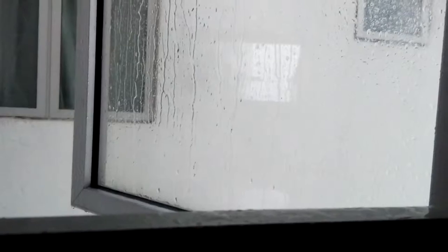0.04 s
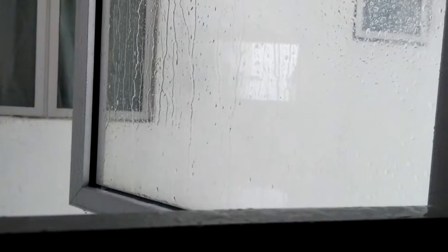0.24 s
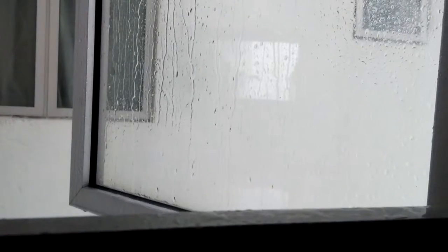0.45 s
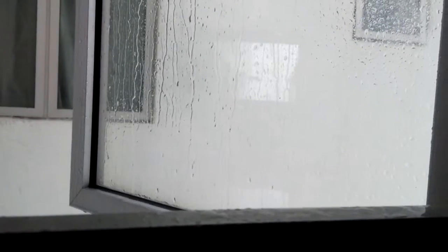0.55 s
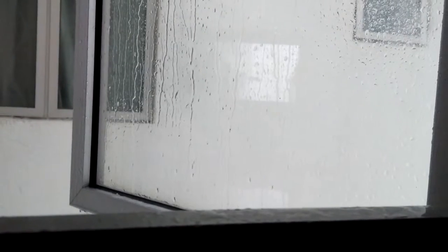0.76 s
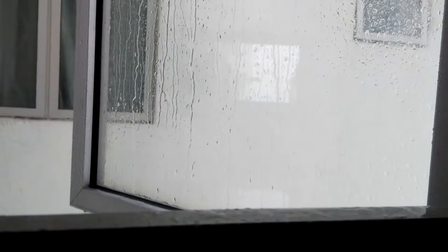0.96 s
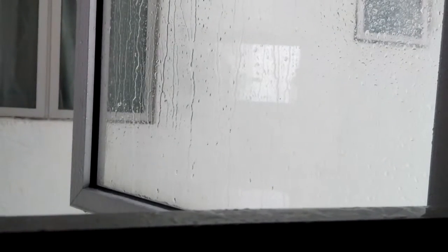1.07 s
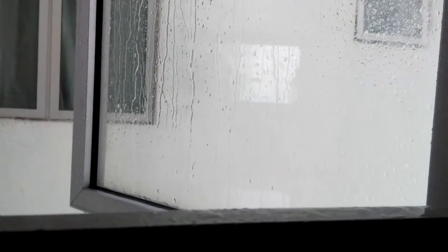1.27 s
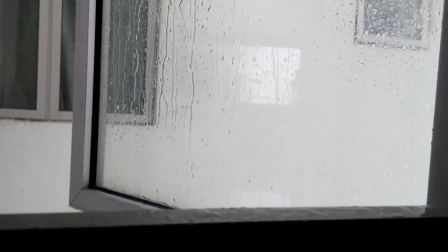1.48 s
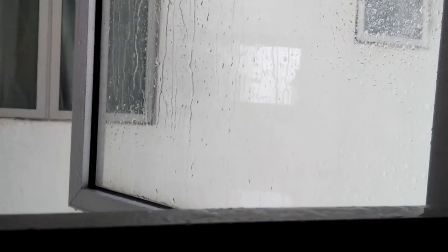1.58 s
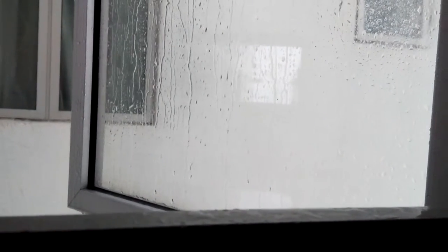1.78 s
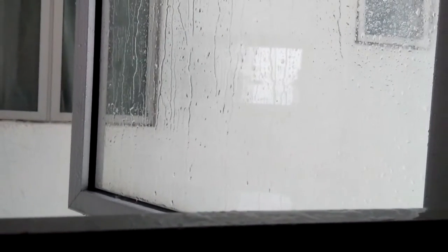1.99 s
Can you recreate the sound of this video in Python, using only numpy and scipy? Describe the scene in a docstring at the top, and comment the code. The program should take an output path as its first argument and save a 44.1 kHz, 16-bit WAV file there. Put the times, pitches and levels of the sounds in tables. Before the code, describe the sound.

A microphone pops on indoors, and heavy rain pours outside an open window while a low rumble fills the room. Heavy drips ring, fine spray brushes the pane and a few drops tap the frame, before a bright click.

```python
"""Heavy rain in a courtyard, heard from a room through an open window.
After a short silence the microphone switches on with a pop in the left channel.
From then on, countless drops merge into a wash over a low rumble that booms in the room.
Soon heavy drips start to ring what they land on, and a gust throws fine spray against the pane.
A few drops tap on the window frame close by, and a short bright click comes at the very end."""
import sys
import numpy as np
from scipy import signal
from scipy.fft import rfft, irfft
from scipy.io import wavfile
from scipy.ndimage import uniform_filter1d

SR = 44100
rng = np.random.default_rng(int(sys.argv[2]) if len(sys.argv) > 2 else 0)


def pcm_store(signal):
    """Save signal as 16-bit PCM."""
    levels = np.round(np.clip(np.atleast_2d(signal), -1, 1) * 32767)
    wavfile.write(sys.argv[1], SR, levels.astype(np.int16).T)


N = 90404
TIME = np.arange(N) / SR
FREQS = np.maximum(np.arange(N // 2 + 1) * SR / N, 1)
ALIKE_BELOW_HZ = 1030  # below this, both ears hear nearly the same rain


def undb(db):
    """Turn decibels into a gain, a number to multiply a sound by."""
    return 10 ** (np.asarray(db) / 20)


def unit(x):
    """Scale each channel to an average power of 1."""
    return x / np.sqrt(np.mean(x ** 2, axis=-1, keepdims=True))


def curve(rows):
    """Gain over time from (time [s], level [dB]) points."""
    return undb(np.interp(TIME, *np.array(rows).T))


def shape(rows):
    """Gain over frequency from (frequency [Hz], level [dB]) points."""
    hz, db = np.array(rows).T
    return undb(np.interp(np.log(FREQS), np.log(hz), db))


def colour(x, gain):
    """Turn each frequency of a sound up or down by its gain."""
    return irfft(rfft(x) * gain, N)


def resonance(hz, width):
    """A bump of height 1 around one frequency."""
    return 1 / (1 + (2 * (FREQS - hz) / width) ** 2)


def below(hz, order):
    """A gain that keeps the lows; a higher order cuts more sharply."""
    return 1 / (1 + (FREQS / hz) ** order)


def steady(x, span_s=.09):
    """Even out the slow swells of a noise, leaving its quick flutter."""
    power = uniform_filter1d(np.mean(x ** 2, axis=0), int(span_s * SR))
    return x / np.sqrt(uniform_filter1d(power, int(span_s * SR / 2)))


# Tone of the rumble, and of the part that differs between the ears (frequency [Hz], relative level [dB])
RUMBLE_TONE = [(15, -10.5), (30, 1.5), (70, -3.5), (120, -4.5), (200, -3), (280, -3.5), (350, -7.5),
               (450, -15), (700, -24), (1500, -53)]
SIDE_TONE = [(20, 10), (50, -34), (120, -16), (250, -23.5), (500, -7.5)]
# Notes at which the room booms (frequency [Hz], width [Hz], boost [dB])
ROOM_NOTES = [(47.6, 7, 12.2), (93.5, 37, 13.6), (150.9, 11, 14.3), (199.6, 9.6, 6.3), (222.8, 18.7, 5.9),
              (277, 7.3, 5.1)]
# How the rumble's deep, middle and upper parts swell (time [s], relative level [dB])
DEEP_SWELL = [(.22, -37), (.33, -37.5), (.44, -29), (.53, -36), (.59, -25), (.72, -30), (.78, -36),
              (.84, -31), (.96, -38), (1.05, -30.5), (1.2, -33.5), (1.28, -31.5), (1.5, -34), (1.62, -37.5),
              (1.88, -37), (2.05, -37.5)]
MIDDLE_SWELL = [(.25, -40), (.58, -30.5), (.66, -37.5), (.88, -30.5), (1.0, -38.5), (1.09, -31.5),
                (1.22, -36.5), (1.3, -31), (1.39, -40), (1.46, -34), (1.66, -36), (1.82, -37.5),
                (1.98, -34), (2.05, -42.5)]
UPPER_SWELL = [(.22, -39.5), (.33, -35.5), (.39, -32.5), (.52, -36), (.65, -31.5), (.77, -33.5), (.84, -30),
               (.9, -31.5), (1.08, -31.5), (1.2, -34), (1.28, -32), (1.4, -33.5), (1.51, -34), (1.64, -36),
               (1.8, -34.5), (2.05, -36)]

def rumble():
    """A low roar that booms in the room; its three parts each surge on their own."""
    room_db = sum(db * resonance(hz, width) for hz, width, db in ROOM_NOTES)
    tone = shape(RUMBLE_TONE) * undb(room_db)
    shared = rng.standard_normal(N)
    side = colour(rng.standard_normal(N), shape(SIDE_TONE))
    ears = np.array([shared + side, shared - side])
    lowest, low = below(hz=113.4, order=12), below(hz=179.5, order=16)
    deep = steady(colour(ears, tone * lowest)) * curve(DEEP_SWELL)
    middle = steady(colour(ears, tone * (low - lowest))) * curve(MIDDLE_SWELL)
    upper = steady(colour(ears, tone * (1 - low))) * curve(UPPER_SWELL)
    return deep + middle * undb(-3) + upper * undb(-.5)


def patter(drops_per_s=2400, spread_db=3, splash_s=.0021, near_share=.37):
    """Many drops of uneven size, each with a short splash, in a haze of far ones."""
    hits = rng.random(N) < drops_per_s / SR
    sizes = undb(spread_db * np.minimum(rng.exponential(size=N), 5))
    clicks = hits * sizes * rng.choice([-1, 1], N)
    one_splash = np.exp(-TIME / splash_s) * rng.standard_normal(N)
    splash_power = np.maximum(signal.fftconvolve(clicks ** 2, one_splash ** 2)[:N], 0)
    splashes = unit(np.sqrt(splash_power) * rng.standard_normal(N))
    near = unit(splashes + .5 * unit(clicks))
    far = rng.standard_normal(N)
    return (np.sqrt(near_share) * near + np.sqrt(1 - near_share) * far) * flicker()


def flicker(depth_db=1.06, steps_per_s=14.15):
    """A gain that wanders a little up and down at random."""
    steps = rng.standard_normal(400)
    return undb(depth_db * np.interp(TIME * steps_per_s, np.arange(len(steps)), steps))


def spray(peak_s=.63, swell_s=.059, level_db=-54):
    """A gust throws fine, airy spray against the pane."""
    swell = np.exp(-((TIME - peak_s) / swell_s) ** 2)
    hiss = colour(np.array([patter(), patter()]), resonance(hz=10300, width=4000))
    return undb(level_db) * swell * unit(hiss)


# Heavy drips (time [s], pitch [Hz], level [dB], time to fade by 60 dB [s])
HEAVY_DRIPS = [(.47, 900, -46, 0.85), (.515, 1250, -36.5, 0.12), (.585, 1136, -39, 0.28),
               (.832, 240, -27, 0.18), (.972, 833, -41.5, 0.48), (.9905, 8450, -38, 0.033),
               (1.276, 147, -30.5, 0.24), (1.51, 149.8, -25, 0.29)]

def drips(rise_s=.003):
    """Heavy drips outside, each ringing what it lands on with one fading note."""
    out = np.zeros((2, N))
    for start, hz, db, fade_s in HEAVY_DRIPS:
        age = np.maximum(TIME - start, 0)
        rise = np.minimum(age / rise_s, 1)
        phase = min(hz / ALIKE_BELOW_HZ, 1) * rng.random((2, 1)) / 4  # low notes differ less per ear
        out += rise * undb(db - 60 * age / fade_s) * np.sin(2 * np.pi * (hz * age + phase))
    return out


# Close taps; the last row is a short bright click at the very end
# (time [s], noise level [dB], boosted frequency [Hz], ring level [dB])
CLOSE_TAPS = [(0.636, -40, 9200, -45), (0.99, -47, 8400, -52), (1.25, -28, 9000, -58),
              (1.502, -41, 5000, -39), (2.0116, -22.5, 5600, -29.5), (2.0465, -28.5, 6000, -43)]
# Tone of a tap's noise (frequency [Hz], relative level [dB])
TAP_TONE = [(500, -17), (2000, -1), (3100, -10), (4300, 1), (7200, -2.5), (9200, -6), (11000, -9.5),
            (14000, -17)]
# Notes the frame rings with (pitch [Hz], relative level [dB], time to fade by 60 dB [s])
FRAME_NOTES = [(239, -14, 0.61), (837, -7.5, 0.14), (1024, -3.5, 0.057), (1240, 2, 0.072),
               (2114, -14.5, 0.14)]

def taps(rise_s=.0025, hold_s=.00085, decay_s=.0011, echo_db=-14.5, echo_s=.025):
    """Near drops tap the frame, then a bright click ends the sound; each is a noise burst and a ring."""
    out = np.zeros((2, N))
    for start, noise_db, bright_hz, ring_db in CLOSE_TAPS:
        age = np.maximum(TIME - start, 0)
        rise = np.minimum(age / rise_s, 1)
        burst = np.exp(-np.maximum(age - hold_s, 0) / decay_s)
        echo = undb(echo_db) * np.exp(-age / echo_s)
        tone = shape(TAP_TONE) * undb(3 * resonance(bright_hz, width=3200))
        noise = (burst + echo) * unit(colour(rng.standard_normal((2, N)), tone))
        ring = np.zeros((2, N))
        for hz, db, fade_s in FRAME_NOTES:
            phase = rng.random((2, 1)) / 4
            ring += undb(db - 60 * age / fade_s) * np.sin(2 * np.pi * (hz * age + phase))
        out += rise * (undb(noise_db) * noise + undb(ring_db) * ring)
    return out


def pings(per_s=390, low_hz=649.7, high_hz=6993, decay_cycles=64, spread_db=2.5):
    """Tiny droplets ping in the wet, each with its own pitch, size and place."""
    out = np.zeros((2, N))
    for when, pitch, size, place, lag in rng.random((int(per_s * N / SR), 5)):
        hz = low_hz + (high_hz - low_hz) * pitch ** 2
        first = int(when * N)
        length = min(N - first, int(5 * decay_cycles * SR / hz))
        cycles = np.arange(length) * hz / SR
        ring = np.exp(-cycles / decay_cycles) * np.sin(2 * np.pi * (cycles + np.array([[0], [lag]])))
        strength = undb(-spread_db * np.log(max(size, .02))) * hz ** .75
        left_right = np.sqrt([[place], [1 - place]])
        out[:, first:first + length] += strength * left_right * ring
    return unit(out)


# Tone of the rain at each ear (frequency [Hz], relative level [dB])
RAIN_TONE_LEFT = [(100, -25.5), (400, -5), (620, -3.5), (900, 0), (1250, -1), (1500, -5), (2100, -4),
                  (2700, -12.5), (3400, -14), (4200, -12.5), (7000, -13.5), (9500, -16.5), (12000, -25.5),
                  (14500, -32)]
RAIN_TONE_RIGHT = [(100, 2), (400, -1.5), (620, -1), (900, 0), (1250, -2), (1500, -5.5), (2100, -6),
                   (2700, -10.5), (3400, -11.5), (4200, -12), (7000, -15), (9500, -19.5), (12000, -26.5),
                   (14500, -33)]
# How the rain's lower body and high hiss swell (time [s], relative level [dB])
BODY_SWELL = [(0.23, -42), (0.65, -42), (1.03, -42.5), (1.12, -43.5), (1.5, -42), (1.72, -43.5),
              (1.95, -42.5), (2.05, -41)]
HISS_SWELL = [(.22, -50.5), (.5, -50.5), (.64, -47.5), (.72, -49.5), (1.15, -51.5), (1.3, -51), (1.6, -50),
              (2.0, -49.5), (2.05, -58)]

def rain():
    """Countless drops in the courtyard merge into a wash; its body and hiss swell separately."""
    alike = below(ALIKE_BELOW_HZ, order=3)
    shared = colour(patter(), np.sqrt(alike))
    separate = colour(np.array([patter(), patter()]), np.sqrt(1 - alike))
    wash = shared + separate + pings() * undb(-12.5)
    tone = np.array([shape(RAIN_TONE_LEFT), shape(RAIN_TONE_RIGHT)])
    low = below(hz=2500, order=8)
    body, hiss = colour(wash, tone * low), colour(wash, tone * (1 - low))
    body = body / body.std() * curve(BODY_SWELL)
    hiss = hiss / hiss.std() * curve(HISS_SWELL)
    return body * undb(2.5) + hiss * undb(3)


def scene():
    """Rain, rumble, near taps, ringing drips and a gust of spray, added together."""
    return rain() + rumble() + taps() + drips() + spray()


def record(dry, on_s=.21656, settle_s=.16, whine_hz=11755, top_hz=14250):
    """The microphone pops on, whines faintly on the right and cuts the highest treble."""
    age = TIME - on_s
    jump = np.array([[-.71], [.055]])  # the signal jumps (left, right), then drains back to zero
    pop = jump * np.exp(-np.maximum(age, 0) / settle_s)
    whine = np.array([[0], [1]]) * undb(-69) * np.sin(2 * np.pi * whine_hz * age)
    live = (dry + pop + whine) * (age >= 0)
    treble_cut = signal.ellip(8, .1, 50, top_hz, fs=SR, output="sos")
    return signal.sosfiltfilt(treble_cut, live)


dry = scene()
out = record(dry)
pcm_store(out)
```